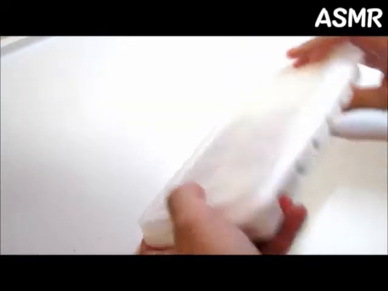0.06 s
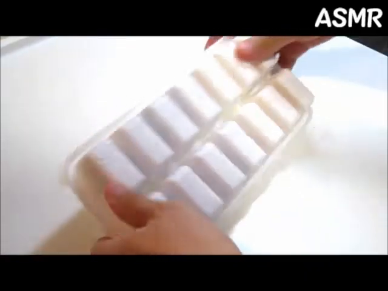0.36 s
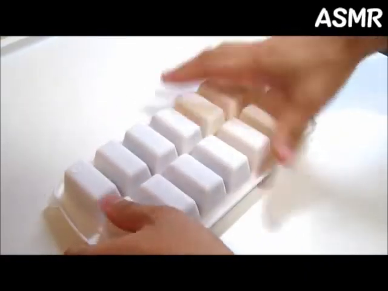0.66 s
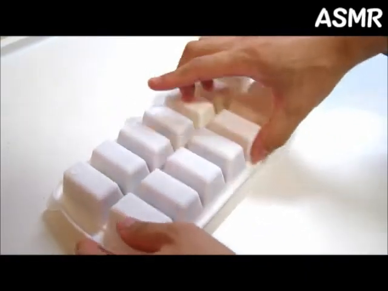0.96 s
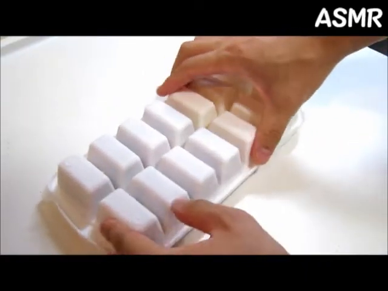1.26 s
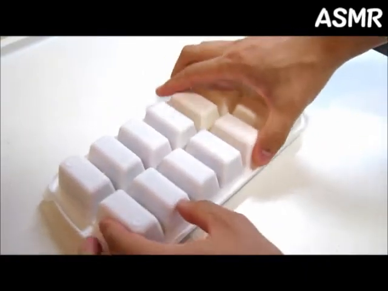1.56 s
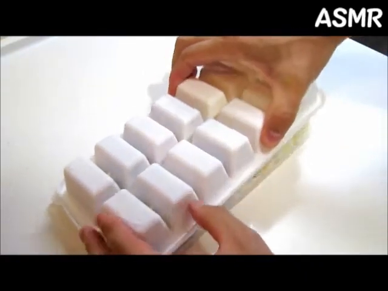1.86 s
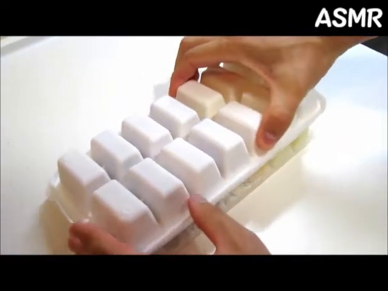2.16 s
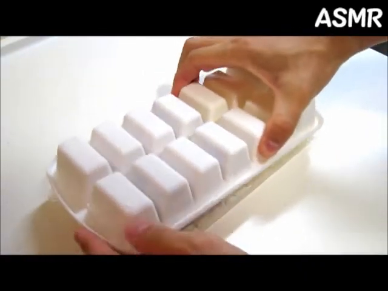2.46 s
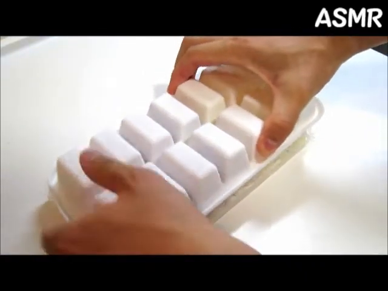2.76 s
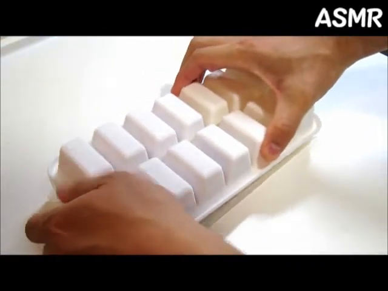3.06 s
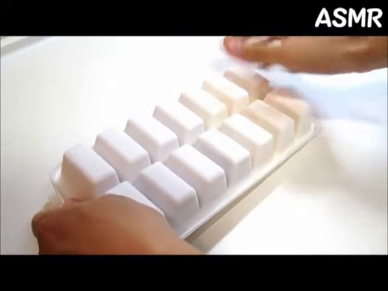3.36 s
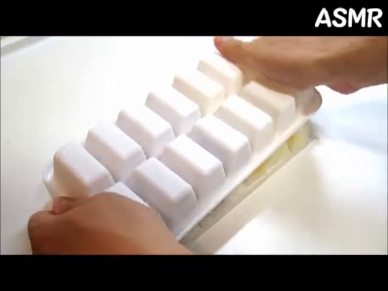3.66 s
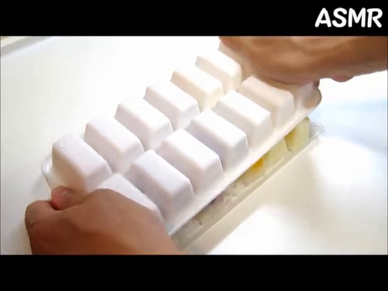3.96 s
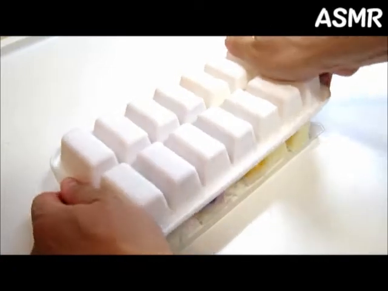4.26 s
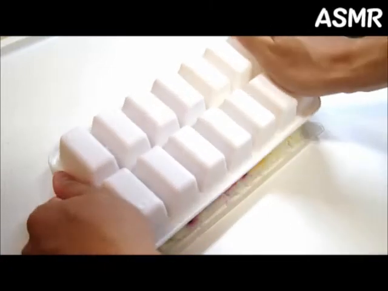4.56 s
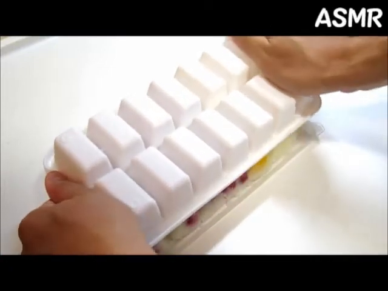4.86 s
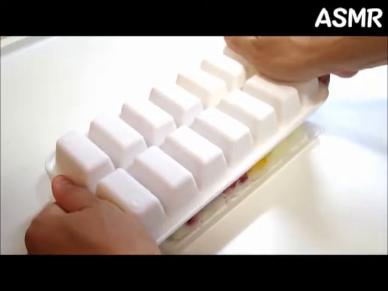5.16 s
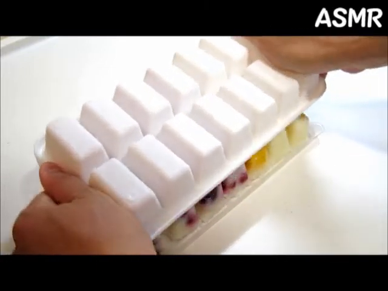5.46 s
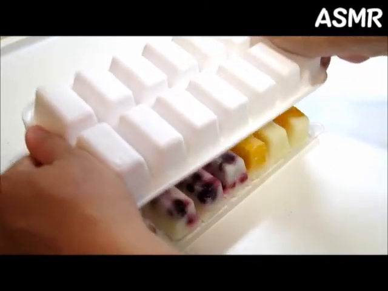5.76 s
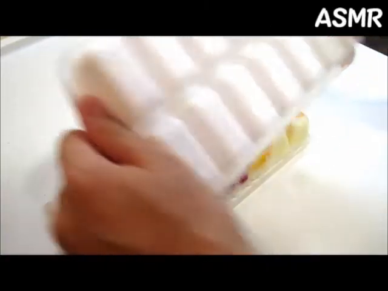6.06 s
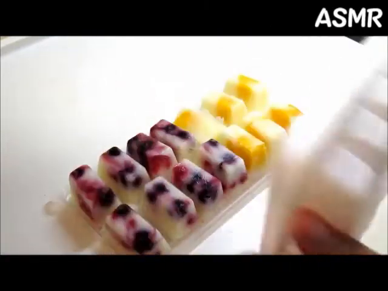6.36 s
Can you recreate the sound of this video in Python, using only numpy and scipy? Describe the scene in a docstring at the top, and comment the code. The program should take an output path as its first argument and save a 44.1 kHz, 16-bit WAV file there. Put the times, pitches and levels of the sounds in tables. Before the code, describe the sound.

Close microphones in a small kitchen pick up a plastic tray of ice bumping down on the counter. As it is flexed again and again, the plastic creaks, ticks and pops while the ice breaks loose in uneven clusters of brittle snaps. There is faint finger rubbing and one brief squeak early on. Finally the cubes land on the lid with soft, hollow knocks, over a low room hush.

```python
"""Ice cubes crack loose from a plastic tray, turned over on a kitchen counter, pressed and twisted.
Each crack is a short run of slips that knocks a cell wall, snaps in the treble and rings the tray;
the counter thumps underneath. Every twist makes frost crackle and cell walls tick and pop.
Fingers brush the plastic and squeak once, and near the end the cubes drop onto the lid.
Two close microphones hear it in a small room."""
import sys
import numpy as np
from scipy import signal
from scipy.fft import rfft, irfft
from scipy.io import wavfile
from scipy.ndimage import uniform_filter1d

SR = 44100
rng = np.random.default_rng(int(sys.argv[2]) if len(sys.argv) > 2 else 0)


def write(x):
    x = np.atleast_2d(x).T
    wavfile.write(sys.argv[1], SR, np.round(np.clip(x, -1, 1) * 32767).astype(np.int16))


N = 286650
TIME = np.arange(N) / SR
RING = np.arange(SR // 3) / SR  # time axis of one hit, in seconds
LEAD = SR // 40  # samples of pre-roll for the slips that warn of a crack


def undb(db):
    """Decibels to gain."""
    return 10 ** (np.asarray(db) / 20)


def unit(x):
    """Scale to rms 1."""
    return x / np.sqrt(np.mean(x ** 2))


def hit(x, db):
    """Give a transient the energy of a hundredth of a second at this level."""
    energy = np.sum(np.atleast_2d(x) ** 2, axis=-1).mean()
    return x * undb(db) * np.sqrt(SR / 100 / energy)


def curve(points, hz):
    """Read (hz, value) points on a log-frequency axis."""
    point_hz, value = np.transpose(points)
    return np.interp(np.log(hz + 1), np.log(point_hz), value)


def eq(x, points, tilt_db=0, size=2048):
    """Minimum-phase EQ through (hz, db) points, tilted by tilt_db an octave above 2500 Hz."""
    hz = np.fft.rfftfreq(size, 1 / SR)
    gain_db = curve(points, hz) + tilt_db * np.log2(np.maximum(hz, 2500) / 2500)
    cepstrum = irfft(np.log(undb(gain_db)))
    cepstrum[1:size // 2] *= 2
    cepstrum[size // 2 + 1:] = 0
    impulse = irfft(np.exp(rfft(cepstrum)))
    return signal.fftconvolve(np.atleast_2d(x), impulse[None], axes=-1)[:, :x.shape[-1]]


def low_cut(x, hz, order=2):
    """High-pass: small things radiate little bass."""
    return signal.sosfilt(signal.butter(order, hz, "high", fs=SR, output="sos"), x)


def decay(t60_s):
    """Exponential tail, 60 dB down after t60_s."""
    return np.exp(-np.log(1000) * RING / t60_s)


def ring(modes, scatter_db, detune):
    """Modes struck at a new spot: each has its own strength, sign and slight detuning."""
    out = 0
    for hz, db, t60_s in modes:
        gain = rng.choice([-1, 1]) * undb(db + scatter_db * rng.standard_normal())
        pitch_hz = hz * (1 + detune * rng.standard_normal())
        out += gain * decay(t60_s) * np.sin(2 * np.pi * pitch_hz * RING)
    return out


def stereo(mid, side, width):
    """Left and right from mid and side."""
    return (mid + width * side * np.array([[1], [-1]])) / np.sqrt(1 + width ** 2)


def drive(push, response):
    """Pass a run of slips through a response."""
    return signal.fftconvolve(np.atleast_2d(response), push[None], axes=-1)[:, :len(RING)]


def add(out, start_s, x):
    """Mix x in at start_s."""
    i = max(int(start_s * SR), 0)
    out[:, i:i + x.shape[-1]] += x[..., :N - i]


def grit(per_s, spread_db, t60_s):
    """Envelope of random grains, mostly tiny, a few much larger."""
    onsets = rng.random(N) < per_s / SR
    grains = onsets * undb(spread_db * np.minimum(rng.exponential(size=N), 3))
    return np.sqrt(np.abs(signal.fftconvolve(grains ** 2, decay(t60_s) ** 2)[:N]))


# Dark bed of room air: freq_hz, gain_db
ROOM_EQ = [(15, -40.5), (25, -13.5), (87, 0.5), (170, -1), (1610, -19.5), (2410, -32), (5730, -28.5),
           (6380, -28.5), (7710, -29.5), (10100, -35.5), (16000, -51.5)]
def room_tone(level_db=-49.5):
    """The soft, steady rush of the room."""
    air = stereo(*rng.standard_normal((2, N)), width=0.93)
    return unit(eq(air, ROOM_EQ)) * undb(level_db)


# Kitchen reverb, band by band: centre_hz, t60_s, wet_db
REVERB_BANDS = [(110, 1, -17.5), (301, 0.18, -6.5), (916, 0.24, -7.5), (2510, 0.11, 0), (5840, 0.13, -3.5),
                (14160, 0.14, -1)]
def kitchen_reverb(x, predelay_s=0.0034, build_s=0.0022):
    """Cupboards and walls return a short, dense echo, wider in the treble."""
    size, impulse = len(RING), 0
    hz = np.fft.rfftfreq(size, 1 / SR)
    centres = np.array(REVERB_BANDS)[:, 0]
    attack = np.clip((RING - predelay_s) / build_s, 0, 1)
    release = np.clip((RING[-1] - RING) / .05, 0, 1)
    for centre_hz, t60_s, wet_db in REVERB_BANDS:
        noise = stereo(*rng.standard_normal((2, size)), width=min(0.19 + centre_hz / 2500, 1))
        tail = unit(noise * decay(t60_s) * attack)
        band = curve(np.c_[centres, centres == centre_hz], hz)
        impulse += irfft(rfft(tail) * np.sqrt(band), size) * undb(wet_db) / np.sqrt(size)
    return signal.fftconvolve(x.mean(axis=0)[None], impulse * release, axes=-1)[:, :N]


# Skin sliding on plastic: middle_s, duration_s, level_db
FINGER_STROKES = [(0.311, 0.03, -47), (0.387, 0.049, -50), (1.352, 0.026, -44), (1.43, 0.019, -44.5),
                  (2.939, 0.021, -36), (5.424, 0.066, -51)]
def finger_rubs(hiss_hz=6500, width_octaves=0.42):
    """Fingers shifting their grip brush the plastic with a fine, grainy hiss."""
    hz = np.fft.rfftfreq(N, 1 / SR) + 1
    skin = rng.standard_normal((2, N)) * grit(per_s=900, spread_db=4, t60_s=.006)
    hiss = irfft(rfft(skin) / (1 + (np.log2(hz / hiss_hz) / width_octaves) ** 2), N)
    swells = sum(undb(db) * np.exp(-2 * ((TIME - middle_s) / duration_s) ** 2)
                 for middle_s, duration_s, db in FINGER_STROKES)
    return unit(hiss) * swells


# Hands pressing or twisting the tray: start_s, end_s, creak_db, crackle_db
HAND_TWISTS = [(0.241, 0.67, -38.5, -49.5), (0.942, 1.108, -36.5, -44.5), (1.424, 1.446, -32.5, -42),
               (1.914, 2.176, -32.5, -43.5), (2.28, 2.451, -41.5, -46), (2.51, 2.557, -38, -37),
               (2.802, 2.993, -35.5, -41.5), (3.222, 3.32, -44, -54.5), (3.61, 3.65, -53, -72),
               (3.678, 3.904, -43.5, -47.5), (4.346, 4.56, -34, -36.5), (4.612, 4.98, -43, -45),
               (5.242, 5.244, -37, -35), (5.36, 5.605, -47.5, -50), (6.195, 6.508, -58.5, -65.5)]
def strain(t, grip_db_per_s=176, relax_db_per_s=147):
    """Creak and crackle envelopes in dB: each twist builds, holds and relaxes."""
    start_s, end_s, creak_db, crackle_db = np.transpose(HAND_TWISTS)[..., None]
    slack_db = grip_db_per_s * np.maximum(start_s - t, 0) + relax_db_per_s * np.maximum(t - end_s, 0)
    return (creak_db - slack_db).max(axis=0), (crackle_db - slack_db).max(axis=0)


# Boxy tone of creaking plastic: freq_hz, gain_db
CREAK_EQ = [(90, -29), (200, 7), (400, 8), (520, 0.5), (820, 7.5), (1050, -1.5), (1500, -6.5),
            (2300, -15.5), (5000, -40.5)]
def frost(trim_db=-1):
    """Tiny slips of plastic on frost and skin, as loud as the tray is strained."""
    creak_db, crackle_db = strain(TIME)
    grains = grit(per_s=380, spread_db=5.5, t60_s=.008)
    creak = eq(stereo(*rng.standard_normal((2, N)), width=0.4) * grains, CREAK_EQ)
    crackle = eq(stereo(*rng.standard_normal((2, N)), width=0.76) * grains, ICE_EQ, tilt_db=-5.5)
    return (unit(creak) * undb(creak_db) + unit(crackle) * undb(crackle_db)) * undb(trim_db)


# Falling glide of a fingertip: time_s, pitch_hz, level_db
SQUEAK_GLIDE = [(1.412, 295.3, -32), (1.416, 275, -29), (1.43, 278.7, -21.5), (1.441, 275, -20.5),
                (1.448, 240, -31), (1.456, 232, -56)]
def finger_squeak(jitter=0.044, scuff_db=-13):
    """A fingertip sticks and slips, slowing a little unevenly and scuffing on each slip."""
    time_s, pitch_hz, level_db = np.transpose(SQUEAK_GLIDE)
    waver = unit(uniform_filter1d(rng.standard_normal(N), size=150))
    phase = 2 * np.pi * np.cumsum(np.interp(TIME, time_s, pitch_hz) * (1 + jitter * waver)) / SR
    tone = unit(sum(undb(db) * np.sin(k * phase) for k, db in [(1, 0), (2, -19), (3, -15), (5, -21)]))
    pulsed_noise = rng.standard_normal(N) * (1 + np.cos(phase))
    scuff = unit(low_cut(eq(pulsed_noise, CREAK_EQ), 500))
    gate = (TIME > time_s[0]) & (TIME < time_s[-1])
    return (tone + undb(scuff_db) * scuff) * undb(np.interp(TIME, time_s, level_db)) * gate


# Low boom of the worktop: pitch_hz, level_db, t60_s
COUNTER_MODES = [(88, -8.5, .12), (96.7, -11, 0.28), (115.3, -0.5, 0.16), (138, -5, 0.089),
                 (161.3, -10, 0.043), (188, 3.5, 0.044)]
def counter_thumps(lag_s=0.0019, held_clear_db=-10.5):
    """The worktop booms under the tray's rim, and faintly with each crack as hands hold the tray clear."""
    out = np.zeros((2, N))
    thumps = [(start_s, thump_db) for start_s, *_, thump_db in TRAY_BUMPS]
    thumps += [(start_s, body_db + held_clear_db) for start_s, _, body_db, *_ in ICE_CRACKS]
    for start_s, level_db in thumps:
        boom = low_cut(ring(COUNTER_MODES, scatter_db=2, detune=.03), 75, order=4)
        add(out, start_s + lag_s, hit(boom, level_db))
    return out


# Cubes landing on the lid: start_s, pitch_hz, level_db
LID_KNOCKS = [(5.5444, 410, -22.5), (5.5542, 393, -28), (5.564, 535, -29), (5.572, 600, -39),
              (5.586, 384, -31), (5.596, 440, -28), (5.623, 425, -42), (5.642, 447, -50)]
def cube_drops(t60_s=0.045):
    """Freed cubes land on the lid with soft, hollow knocks."""
    out = np.zeros((2, N))
    for start_s, pitch_hz, level_db in LID_KNOCKS:
        modes = [(pitch_hz, 0, t60_s), (pitch_hz * 1.6, -8, t60_s)]
        add(out, start_s, hit(ring(modes, scatter_db=0.82, detune=0.015), level_db))
    return out


# Low-mid ring of the whole tray: pitch_hz, level_db, t60_s
BODY_MODES = [(208.1, 11, 0.18), (240, -60, 0.029), (288.3, -5, 0.33), (355, -10.5, 0.1), (369, 22, 0.03),
              (412.8, 0.5, 0.21), (426.6, -3.5, 0.18), (546.8, -1, 0.15)]
def tray_body(pitch_hz, t60_s=0.021, attack_s=0.004):
    """A broad sheet of plastic swings a few times, then the tray's own modes ring on."""
    swing = np.sin(2 * np.pi * pitch_hz * RING) * decay(t60_s) * rng.choice([-1, 1])
    tail = ring(BODY_MODES, scatter_db=3, detune=.02)
    return (hit(swing, 0) + hit(tail, 0)) * (1 - np.exp(-RING / attack_s))


# Hollow ring of the cell walls: pitch_hz, level_db, t60_s
WALL_MODES = [(632, -1, .15), (721, -2, .16), (756, -1, .15), (802, 2, .14), (832, 1, .12), (903, 2, .14),
              (968, -1, .12), (1060, -3, .08), (1175, -5, .08), (1336, -2, .11), (1405, -5, .1),
              (1470, -3, .1), (1710, -7, .07), (1857, -7, .07), (2054, -9, .07)]
def cell_knock(push, tuning_hz, t60_s=.015, low_db=-2, high_db=-18, walls_db=-6):
    """Slips knock one damped cell wall, with a mode either side of its tuning; the other walls ring."""
    knock = 0
    for ratio, db in [(.9, low_db), (1.45, high_db)]:
        cell = ring([(tuning_hz * ratio, 0, t60_s)], scatter_db=0, detune=.02)
        knock += hit(low_cut(drive(push, cell), 650), db)
    mid, side = (ring(WALL_MODES, scatter_db=3, detune=.012) for _ in range(2))
    walls = signal.sosfilt(signal.butter(2, 1600, fs=SR, output="sos"), stereo(mid, side, width=.35))
    return knock + hit(low_cut(drive(push, walls), 498), walls_db)


MEDIUM_HIT_DB = -28
def body_pitch(body_db):
    """A harder hit bends more of the tray, so it sounds lower."""
    return 345.4 - 3.5 * (body_db - MEDIUM_HIT_DB)


def cell_tuning(start_s, snap_db, lift_s=3.5, lift_hz=87):
    """Cells ring higher when knocked more sharply, and once the tray is off its lid."""
    return 953 + 2 * (snap_db - MEDIUM_HIT_DB) + lift_hz * (start_s > lift_s)


# Tray meeting the counter: start_s, body_hz, body_db, knock_db, snap_db, thump_db
TRAY_BUMPS = [(.066, 293, -31.5, -37, -54, -34.5), (.212, 233, -18, -23.5, -48.5, -25),
              (.237, 237, -15.5, -23, -32.5, -22.5), (0.331, 213, -25, -33.5, -42, -18),
              (.406, 246, -24.5, -24.5, -35, -21.5), (.7, 303, -11, -16, -18.5, -15.5),
              (.974, 252, -26.5, -54, -31.5, -35), (1.063, 320, -21, -23, -21, -20),
              (1.283, 266, -34.5, -42.5, -46.5, -29)]
def bump_cues(length_s=.0022, tilt_db=-4):
    """The tray is set down and pressed onto the counter, jolting plastic and ice."""
    return [(start_s, length_s, body_db, body_hz,
             knock_db, cell_tuning(start_s, snap_db), snap_db, tilt_db)
            for start_s, body_hz, body_db, knock_db, snap_db, _ in TRAY_BUMPS]


def stray_ticks(count=30, spread_db=5, knock_trim_db=-3, snap_trim_db=-4.5):
    """Faint pops at random moments until the cubes drop, as loud as the tray is strained."""
    start_s = rng.uniform(HAND_TWISTS[0][0], LID_KNOCKS[0][0], count)
    creak_db, crackle_db = np.array(strain(start_s)) + spread_db * rng.uniform(-1, 1, (2, count))
    return list(zip(start_s, creak_db + knock_trim_db, crackle_db + snap_trim_db))


# Cell walls flexing: start_s, knock_db, snap_db
WALL_POPS = [(.487, -25, -49), (.907, -24.5, -33.5), (1.473, -31.5, -55), (1.88, -27.5, -51),
             (2.058, -26.5, -32.5), (2.257, -22, -33.5), (2.283, -22, -32), (2.354, -27, -36),
             (2.369, -24, -38), (2.56, -14, -27), (2.615, -28, -46), (2.682, -31.5, -42.5),
             (2.725, -26.5, -42.5), (2.76, -35, -44), (2.857, -28.5, -44), (2.976, -20.5, -46),
             (3.003, -25, -51), (3.011, -26.5, -52), (3.024, -25, -37), (3.083, -25.5, -39.5),
             (3.118, -37.5, -44), (3.246, -27.5, -40), (3.28, -35, -65), (3.325, -31.5, -40.5),
             (3.343, -57, -69), (3.412, -20.5, -36.5), (4.075, -33, -43.5), (4.371, -35, -47),
             (4.402, -19.5, -36), (4.983, -28, -36), (4.999, -23, -47), (5.1545, -18.5, -28.5),
             (5.322, -35.5, -58)]
def pop_cues(tuning_hz=973, longest_s=.0045, halving_db=6.5, tilt_db=-4.5):
    """A cell wall flexes with a hollow pop and little body; a harder pop is shorter."""
    cues = []
    for start_s, knock_db, snap_db in WALL_POPS + stray_ticks():
        length_s = longest_s * .5 ** (max(knock_db - MEDIUM_HIT_DB, 0) / halving_db)
        body_db = knock_db - 16
        cues.append((start_s, length_s, body_db, body_pitch(body_db),
                     knock_db, tuning_hz, snap_db, tilt_db))
    return cues


def slips(length_s, warning_db, per_s=1800, warnings=10, most=40):
    """A crack front advances in uneven jumps; a few faint ones warn of it, sooner for a long crack."""
    span = int(length_s * SR)
    place = rng.random(most)  # in crack lengths from the onset
    size = undb(3 * rng.standard_normal(most)) * rng.choice([-1, 1], most)
    early = rng.exponential(size=warnings)
    place[:warnings] = -1.4 * early
    size[:warnings] *= undb(warning_db) * np.exp(-early / 2)
    place[warnings] = 0  # the first full jump lands on the onset
    jumps = warnings + 2 + int(per_s * span / SR)
    push = np.zeros(LEAD + span + 1)
    np.add.at(push, np.maximum(LEAD + place[:jumps] * span, 0).astype(int), size[:jumps])
    return push


# Brittle top end of snapping ice: freq_hz, gain_db
ICE_EQ = [(500, -27.5), (1300, -3.5), (2000, -2.5), (2550, -9), (3050, -2.5), (4500, 1), (5600, 0),
          (6800, 1.5), (8200, -2), (10000, -2.5), (12200, -16.5), (14000, -4.5), (16000, -14)]
def ice_snap(push, tilt_db, t60_s=0.012, rattle_db=-17, rattle_t60_s=0.062, echo_db=-26, echo_t60_s=0.29):
    """Every jump snaps with a noise of its own; loose ice rattles and the room's treble echo fades."""
    cube_eq = [(hz, db + 2 * rng.standard_normal()) for hz, db in ICE_EQ]  # each cube has its own colour
    direct_power = drive(push ** 2, decay(t60_s) ** 2 + (undb(rattle_db) * decay(rattle_t60_s)) ** 2)
    echo_power = drive(push ** 2, (undb(echo_db) * decay(echo_t60_s)) ** 2)
    noise = rng.standard_normal((4, len(RING)))
    direct = stereo(*noise[:2], width=0.78) * np.sqrt(np.abs(direct_power))
    echo = noise[2:] * np.sqrt(np.abs(echo_power))
    return eq(direct + echo, cube_eq, tilt_db)


# Ice breaking free: start_s, length_s, body_db, knock_db, snap_db, tilt_db_per_octave
ICE_CRACKS = [(0.531, 0.0018, -40, -30.5, -34.5, -8.5), (0.584, 0.0026, -55, -79, -36.5, 1),
              (0.678, 0.00069, -33, -30.5, -37, -2), (0.72, 0.00048, -21.5, -55, -30, -2.5),
              (0.913, 0.0064, -25.5, -25.5, -29, -5.5), (1.017, 0.0048, -23.5, -25.5, -27.5, -7),
              (1.069, 0.0068, -17, -23.5, -21, -3.5), (1.166, 0.0057, -33, -37, -37, -1.5),
              (1.621, 0.0051, -31.5, -37, -35.5, -3), (1.864, 0.0028, -33, -30, -40, -12),
              (1.945, 0.0036, -49, -59, -34, 2), (1.9633, 0.0021, -22.5, -41, -17, -18.5),
              (1.968, 0.0025, -18, -13.5, -19.5, -0.5), (1.982, 0.0089, -31, -38, -21, -7),
              (2.022, 0.0088, -33, -35, -29.5, -8), (2.1, 0.0014, -31, -21.5, -36, 0),
              (2.107, .008, -33, -18.5, -26, -7), (2.175, 0.0023, -56, -34.5, -33.5, -11),
              (2.229, 0.0017, -49, -32, -33.5, -0.5), (2.27, 0.0035, -26, -15, -26.5, -6),
              (2.311, 0.0028, -28.5, -26, -23, 0.5), (2.326, 0.014, -26, -24.5, -32, -6),
              (2.4, 0.0049, -34, -30.5, -26.5, 3), (2.521, 0.0088, -27, -22, -22, -2.5),
              (2.537, 0.0024, -29.5, -27.5, -20, -0.5), (2.573, 0.0102, -46, -26, -27, -12),
              (2.787, 0.0031, -32, -29, -24.5, -9), (2.799, 0.005, -23.5, -22.5, -21.5, -8),
              (2.967, 0.006, -17.5, -30, -20, -7.5), (3.178, .001, -59, -44, -46.5, 6),
              (3.593, 0.0034, -35, -27.5, -29, -7), (3.652, 0.0057, -41, -24, -26.5, -7),
              (3.746, 0.0085, -31, -31.5, -30.5, -3.5), (3.762, 0.0053, -28.5, -28, -31.5, -3.5),
              (3.803, 0.0047, -28.5, -23.5, -26, -6), (3.895, .006, -28.5, -27.5, -24, -6),
              (4.051, 0.0027, -38.5, -41.5, -41, 0), (4.122, 0.0014, -44, -39, -27, -2.5),
              (4.288, 0.007, -48, -29.5, -33.5, 4), (4.304, 0.0044, -45.5, -23.5, -25, 8.5),
              (4.318, .011, -31.5, -25.5, -26.5, -7), (4.39, 0.0069, -23, -15.5, -19, -5.5),
              (4.457, 0.0094, -23.5, -19, -20, -1.5), (4.468, 0.0026, -18, -22, -16, -15.5),
              (4.491, .002, -26, -24.5, -17.5, 4), (4.495, 0.0012, -23, -18, -19, -12.5),
              (4.506, 0.0065, -18.5, -24, -16.5, -5.5), (4.663, 0.0067, -33.5, -34, -30, -4.5),
              (4.726, 0.0038, -34.5, -32, -42, 2), (4.837, 0.0092, -47.5, -35.5, -35.5, -2),
              (4.947, 0.0029, -47, -33.5, -31, -4.5), (5.202, 0.011, -36, -29, -31, 2),
              (5.235, 0.0016, -30.5, -27.5, -26, -3.5), (5.257, 0.0055, -32, -20, -25, -5.5),
              (5.507, 0.008, -24, -31.5, -21.5, -3), (5.522, 0.0055, -40, -30, -23, -7),
              (5.536, .006, -19, -24, -19, -5), (5.583, 0.014, -49, -36.5, -32, -4.5),
              (6.207, 0.00074, -50, -44, -41, -3), (6.429, 0.0019, -62, -68, -48, -5)]
def crack_cues():
    """Ice cracks loose from the tray; its force sets the pitch of body and cell."""
    return [(start_s, length_s, body_db, body_pitch(body_db),
             knock_db, cell_tuning(start_s, snap_db), snap_db, tilt_db)
            for start_s, length_s, body_db, knock_db, snap_db, tilt_db in ICE_CRACKS]


# Pan path of the snaps: time_s, left_minus_right_db
ICE_PAN = [(.2, -1), (.9, 0.5), (1.1, 2), (1.9, 0.5), (5.5, 0.5)]
def tray_hits(cues, pitch_spread=0.035, pan_spread_db=3.5):
    """Each bump, pop or crack layers a cell knock, the tray's body and an ice snap, on two stems."""
    plastic, ice = np.zeros((2, 2, N))
    for start_s, length_s, body_db, body_hz, knock_db, tuning_hz, snap_db, tilt_db in cues:
        detune, pan_db = rng.standard_normal(2) * [pitch_spread, pan_spread_db]
        pan_db += np.interp(start_s, *np.transpose(ICE_PAN))
        pan = undb(np.array([[pan_db], [-pan_db]]) / 2)
        # a strained tray gives warning, a slack one snaps out of silence
        creak_db, _ = strain(start_s)
        push = slips(length_s, warning_db=min(creak_db[0] + 24, -11))
        early_s = start_s - LEAD / SR
        add(plastic, early_s, cell_knock(push, tuning_hz * (1 + detune)) * undb(knock_db))
        add(plastic, start_s, hit(tray_body(body_hz), body_db))
        add(ice, early_s, hit(ice_snap(push, tilt_db), snap_db) * pan)
    return plastic, ice


def scene(spots=6, ice_send_db=-2):
    """Tray, counter and fingers in the kitchen; each spot along the tray has its own pattern of echoes."""
    handling = low_cut(cube_drops() + frost() + finger_squeak(), 71) + counter_thumps() + finger_rubs()
    mix = handling + kitchen_reverb(handling) + room_tone()
    cues = bump_cues() + crack_cues() + pop_cues()
    for spot in range(spots):
        plastic, ice = tray_hits(cues[spot::spots])
        plastic = low_cut(plastic, 77)
        mix += plastic + ice + kitchen_reverb(plastic + undb(ice_send_db) * ice)
    return mix


# Balance of the microphone pair: freq_hz, left_minus_right_db
MIC_BALANCE = [(60, -6), (140, -4.5), (280, -4.5), (550, -3.5), (1100, -1.5), (2500, -1), (15000, 2.5)]
def record(dry, lag_s=.00004, top_hz=16300):
    """The right microphone gets more bass, the left hears a little earlier; peaks clip, the top is cut."""
    hz = np.fft.rfftfreq(N, 1 / SR)
    left = undb(curve(MIC_BALANCE, hz) / 2) * np.exp(1j * np.pi * hz * lag_s)
    mics = irfft(rfft(dry) * np.array([left, 1 / left]), N)
    high_cut = signal.ellip(10, .2, 70, top_hz, fs=SR, output="sos")
    return signal.sosfilt(high_cut, np.clip(mics, -1, 1))


dry = scene()
out = record(dry)
write(out)
```